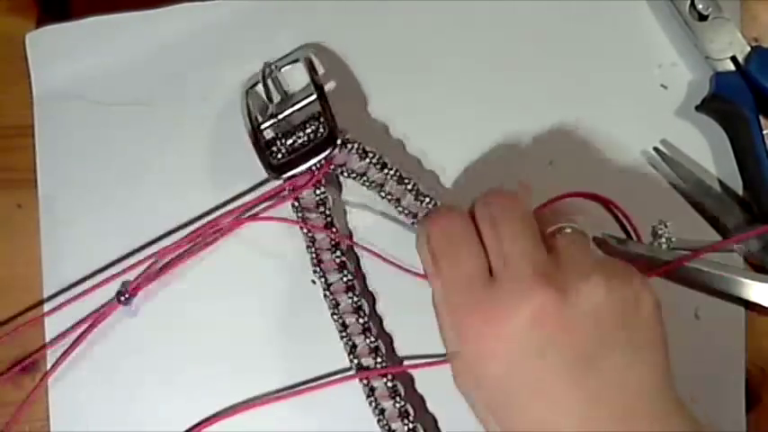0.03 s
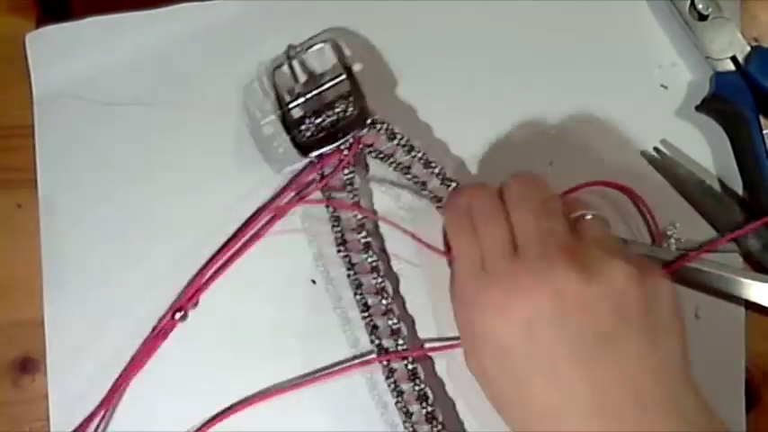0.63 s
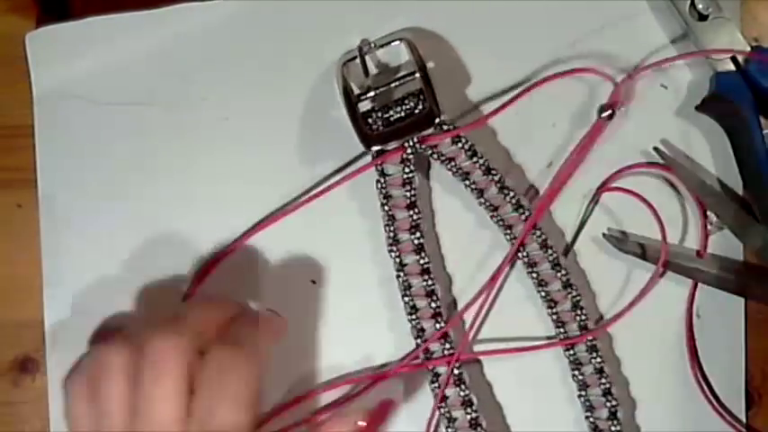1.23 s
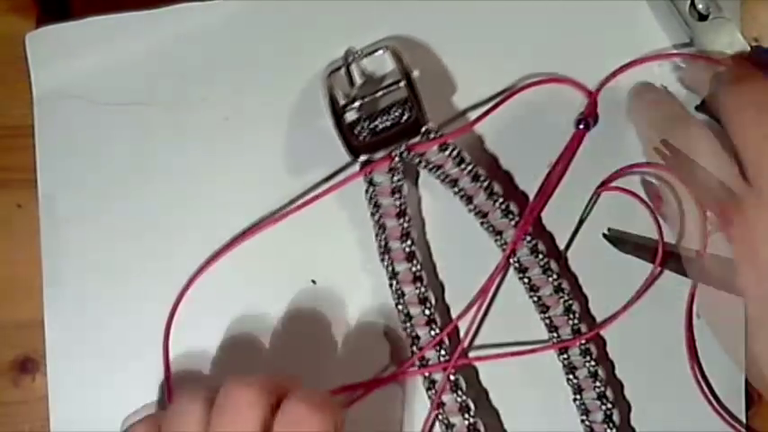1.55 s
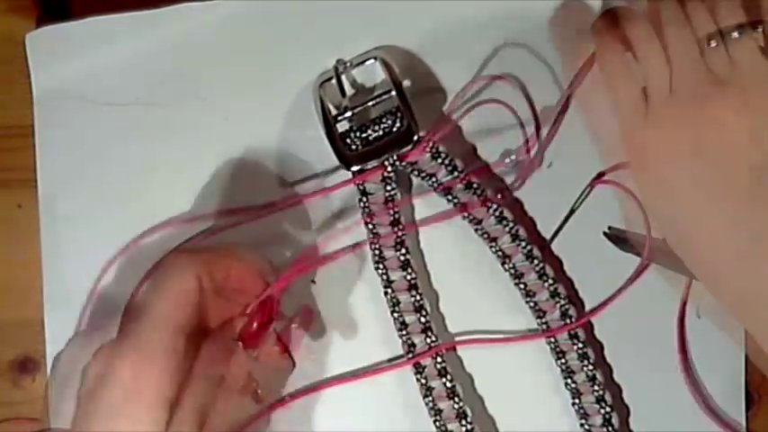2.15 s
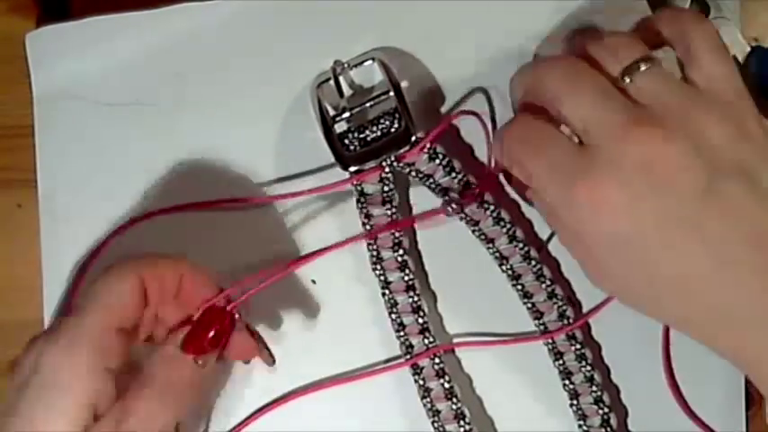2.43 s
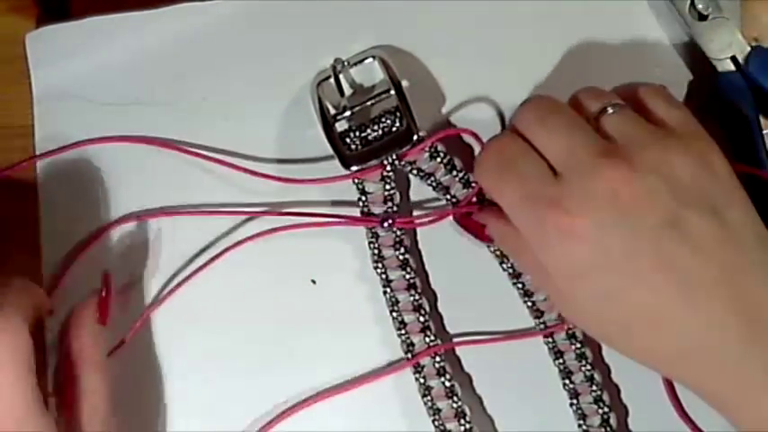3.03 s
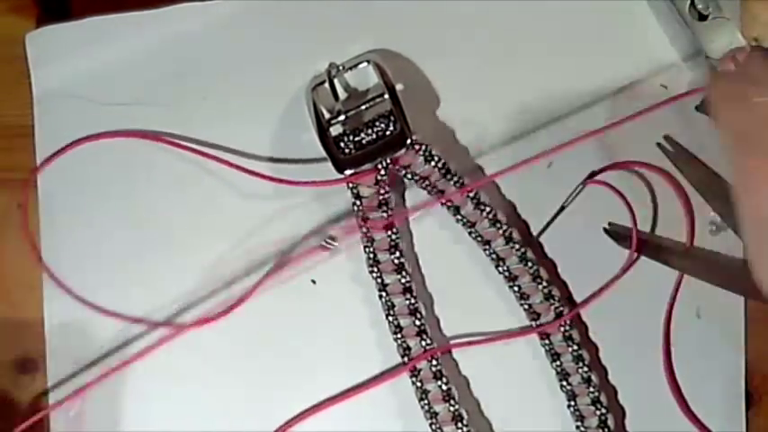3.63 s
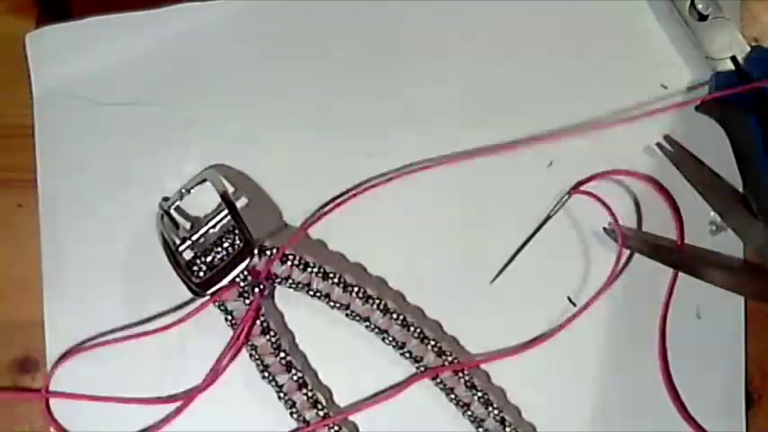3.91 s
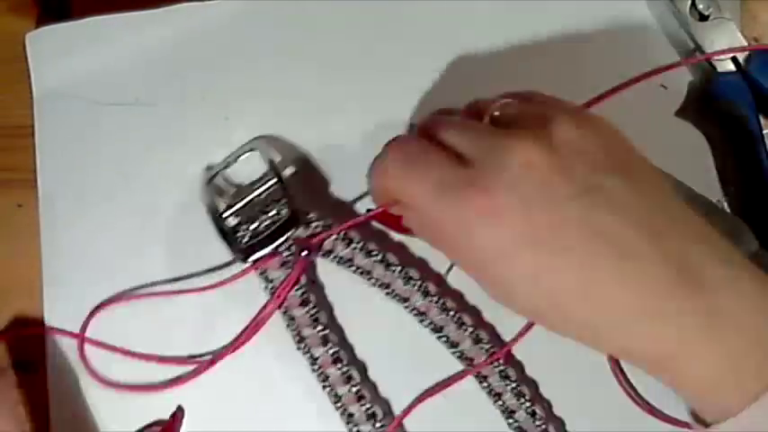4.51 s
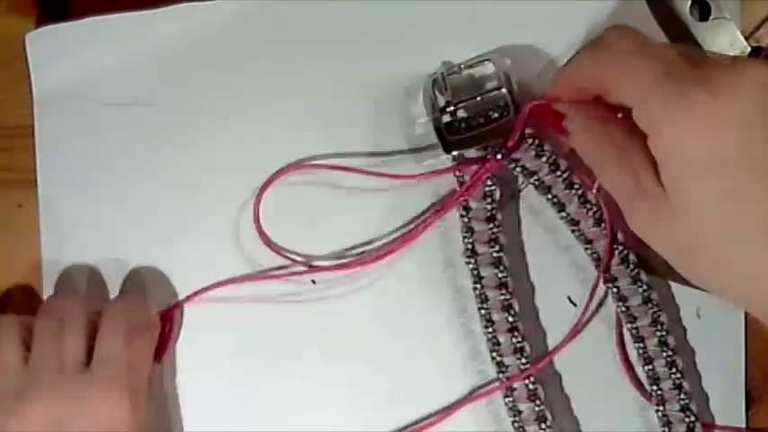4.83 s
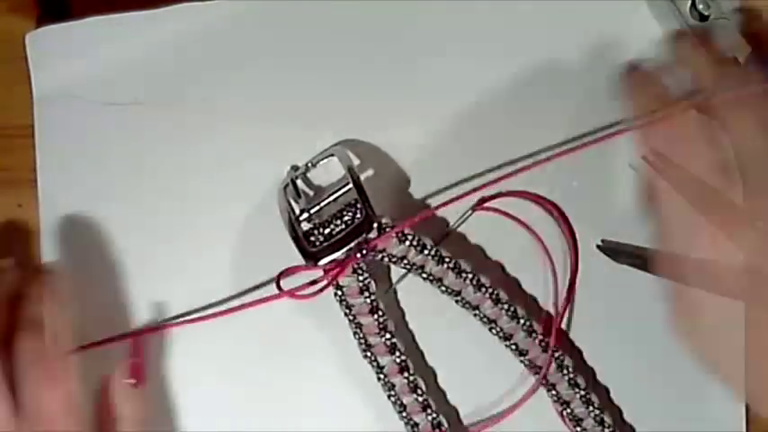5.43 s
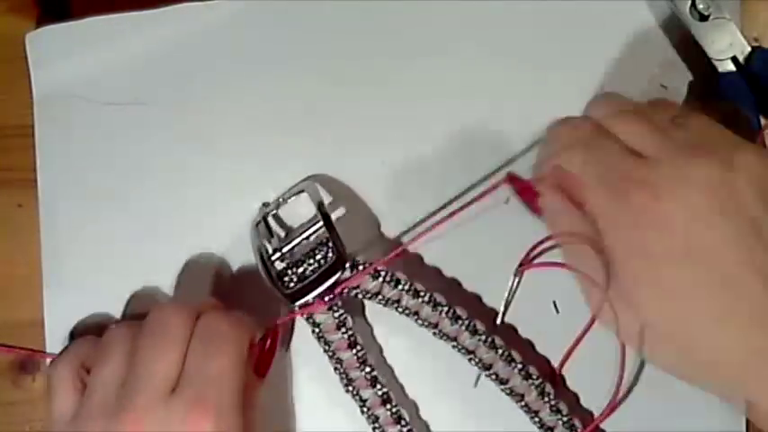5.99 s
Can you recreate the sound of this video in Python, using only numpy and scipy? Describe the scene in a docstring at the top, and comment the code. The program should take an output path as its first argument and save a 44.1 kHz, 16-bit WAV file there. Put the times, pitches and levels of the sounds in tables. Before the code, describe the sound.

A beaded collar knocks and drags on a paper-covered wooden table, with hissing cord pulls, small ticks and a scissor clink.

```python
"""A beaded collar knocks and drags on a paper-covered wooden table while hands thread cord through it.
Each landing makes the table top boom near 470 Hz, and sliding beads rumble, scrape and tick.
The cord hisses as its fibres catch and slip, and fingertips judder on the table.
Nudged scissors clink and small metal parts ring faintly, close to a small microphone in a quiet room."""
import sys
import numpy as np
from scipy import signal
from scipy.fft import rfft, irfft, next_fast_len
from scipy.io import wavfile
from scipy.ndimage import map_coordinates

SR = 44100
rng = np.random.default_rng(int(sys.argv[2]) if len(sys.argv) > 2 else 0)


def waveform_to_disk(signal):
    """Save audio, clipped to [-1, 1], as 16-bit WAV at the path in sys.argv[1]."""
    frames = np.transpose(np.atleast_2d(signal))
    scaled = np.clip(frames, -1, 1) * 32767
    samples = np.round(scaled).astype(np.int16)
    wavfile.write(sys.argv[1], SR, samples)


N = 276066
AGE = np.arange(SR // 2) / SR  # seconds since one short sound began
TOP_HZ = 15600  # the microphone hears nothing above this

# Levels compare rows within a table. A ring time is how long a sound takes to fade by 60 dB.
# The tone colour of each noise. Each row: frequency in Hz, level in dB.
AIR_COLOUR = [(15, -56.5), (25, -17), (137, -5.5), (354, -7.5), (451, -2.5), (677, -13), (840, -6.5),
              (911, -14.5), (1020, -9.5), (1190, -13), (3080, -21), (3620, -22.5), (4740, -25.5),
              (5140, -26.5), (9000, -27.5), (12500, -36.5), (15000, -56)]
HISS_COLOUR = [(3000, -51), (5500, -30.5), (7000, -3.5), (8300, 4), (9300, -4), (10500, -13),
               (12500, -23.5), (15000, -40)]
RASP_COLOUR = [(1000, -52), (3200, -30), (4500, -14), (5400, -6.5), (5900, -4), (6700, 1.5), (7400, -1),
               (9000, -27), (15000, -46.5)]
RUMBLE_COLOUR = [(25, -64), (60, -43.5), (120, -37.5), (250, 0), (400, 7), (490, 8), (660, 4.5), (800, -15),
                 (1050, -24), (1400, -24), (2200, -43), (4000, -39.5), (9000, -51)]
THUD_COLOUR = [(25, -49.5), (60, -22), (120, -35), (230, 8), (400, -2.5), (490, 7), (660, -4), (800, -42),
               (1100, -29), (2000, -48.5), (4000, -79)]
CLACK_COLOUR = [(300, -21), (700, 8), (1100, 0.5), (1600, 1.5), (2100, -8), (2700, -2), (4000, -8),
                (6000, -4.5), (10000, -15.5), (15000, -43)]
# The room's echo. Each row: frequency in Hz, ring time in seconds.
ECHO_TIMES = [(150, .3), (1000, 0.18), (8000, 0.13)]
# The notes a struck thing rings with. Each row: pitch in Hz, level in dB, ring time in seconds.
SCISSOR_NOTES = [(1728, -6, .12), (2435, 0, .13), (2778, -9, .11), (3122, -3, .14), (4037, -10, .14),
                 (4707, -2.5, .17), (5551, -1, .18), (5750, -2, .12), (5952, -3, .17), (6112, -3, .16),
                 (6993, -8, .17), (7429, -7, .16), (7891, -4, .15), (10700, -21, .1)]
SOFT_SCISSOR_NOTES = [(1780, -4.5, .075), (2435, -8.5, 0.057), (3122, -17.5, 0.048), (10870, -26, 0.1)]
BUCKLE_NOTES = [(5415, 2.5, 0.082), (4860, -17, .03), (11950, -2.5, 0.067)]
BEAD_NOTES = [(7330, -1.5, 0.022), (8400, -9, .015), (9170, -4.5, 0.03)]
TABLE_NOTES = [(122, -24, .28), (172, -16, .11), (224, -12, .12), (265, -11, .14), (318, -7, .14),
               (375, -10, .07), (467, 0, .15), (525, -6, .08), (590, -10, .07), (651, -8, .09)]
# Moments when metal is touched. Each row: start in seconds, level in dB.
SCISSOR_NUDGES = [(0.1017, -14), (0.1741, -31)]
SCISSOR_TOUCHES = [(0.083, -32.5), (0.303, -37.5), (0.314, -32), (0.379, -33.5)]
BUCKLE_JINGLES = [(4.527, -36), (4.561, -23)]
BEAD_TOUCHES = [(3.676, -18), (3.736, -21.5)]
# Fingertips rubbing the table, and beads scraping the paper. Each row: loudest moment in seconds,
# level in dB, pitch in Hz, seconds to fall to half strength.
FINGER_RUBS = [(0.234, -40.5, 476, 0.012), (0.272, -33, 480, 0.01), (0.629, -32, 540, .004),
               (0.794, -24, 486, 0.0026), (0.868, -24.5, 463.6, 0.012), (2.351, -27, 487, 0.0029),
               (2.795, -52, 471, 0.014), (2.918, -54, 441, 0.01), (3.078, -54, 336, 0.0049),
               (3.732, -30, 453.5, .007), (4.309, -15.5, 485, 0.0088), (4.385, -20.5, 531, 0.0048),
               (4.431, -16.5, 515, 0.0041), (4.448, -13, 504, 0.0043), (4.716, -22.5, 477, 0.0078),
               (5.219, -34.5, 438, 0.0039), (5.377, -52.5, 508, 0.0056), (5.597, -38.5, 485, 0.0092),
               (5.762, -20, 503, 0.0039), (5.781, -29, 470, 0.0022), (5.990, -33.5, 464, .004),
               (6.150, -41, 500, 0.0066)]
BEAD_SCRAPES = [(0.3, -59.5, 2466, 0.047), (0.384, -55.5, 2330, 0.012), (0.771, -51, 1510, .012),
                (1.82, -48, 1630, 0.021), (3.756, -43, 1343, 0.03), (4.291, -50, 2540, 0.0047),
                (4.459, -44.5, 1770, 0.0092), (4.512, -57, 1280, 0.018), (4.746, -47, 1325, 0.025),
                (4.797, -50.5, 1500, .01), (4.845, -47.5, 1270, 0.02), (5.334, -50, 2860, 0.012),
                (5.683, -51, 3160, 0.02)]
# Small ticks. Each row: start in seconds, level in dB, the crack's pitch in Hz, its ring time in seconds. The
# row at 1.271 s adds a faint, soft noise just before the tick at 1.277 s; the rest are beads and nails.
SMALL_TICKS = [(0.315, -36.5, 7000, 0.041), (0.379, -55, 4500, .05), (0.545, -58, 8340, .04),
               (0.712, -40, 4395, 0.033), (0.768, -42, 5440, .006), (0.789, -32.5, 7100, 0.0085),
               (0.818, -26, 7600, 0.0065), (1.271, -52, 5130, .03), (1.277, -38, 5120, 0.056),
               (1.767, -33, 4920, .015), (2.023, -64, 6000, 0.13), (2.966, -63.5, 3856, 0.05),
               (3.204, -67, 7700, 0.049), (4.243, -44.5, 7250, .03), (4.303, -48, 4870, .024),
               (4.697, -30, 6400, 0.016), (4.796, -49.5, 7900, 0.023), (5.286, -34, 3960, 0.023),
               (5.295, -42, 2800, 0.1), (5.329, -43.5, 5900, .063), (5.624, -35, 8140, 0.016),
               (5.675, -24, 8360, .024)]
# Pulls on the cord. Each row: fastest moment in seconds, seconds speeding up, seconds slowing down,
# hiss level in dB, rasp in dB above the hiss (before a 2 dB cut).
CORD_PULLS = [(0.359, 0.1, .05, -61.5, 3), (0.76, 0.24, 0.069, -48.5, 2.5), (1.09, 0.076, 0.08, -49, -5),
              (1.769, 0.095, 0.13, -55.5, 3), (1.851, 0.06, 0.062, -56, -2.5),
              (2.02, 0.071, 0.045, -53, -12.5), (2.186, 0.19, .125, -51, -13.5),
              (2.409, 0.054, 0.031, -70, 0), (2.469, 0.048, 0.065, -59, 0),
              (2.648, 0.064, 0.044, -61, -1.5), (2.834, 0.036, 0.048, -71, -13),
              (2.991, .06, 0.041, -64, -2.5), (3.553, 0.032, 0.076, -57.5, -4.5),
              (3.645, .025, .05, -55, -33), (3.745, 0.12, 0.12, -56, 6.5),
              (3.874, 0.047, 0.033, -58.5, -1.5), (4.0, .06, 0.052, -69.5, 0.5),
              (4.143, 0.032, 0.12, -56, -20), (4.285, 0.084, 0.13, -55.5, -4.5),
              (4.444, .04, 0.055, -54.5, -4.5), (4.51, .09, 0.2, -52, -4.5), (4.71, 0.1, 0.17, -53.5, -22),
              (5.01, 0.046, 0.17, -48, -7.5), (5.689, 0.082, 0.13, -51, -1),
              (5.965, 0.094, 0.077, -68, -2.5), (6.105, 0.048, 0.054, -74, 1)]
# The collar sliding. Each row: fastest moment in seconds, seconds speeding up, seconds slowing down,
# level in dB, bass cutoff in Hz (higher when the collar rests lightly).
COLLAR_DRAGS = [(0.33, 0.058, 0.086, -42, 506), (0.645, .12, 0.12, -40, 380), (0.785, .17, 0.05, -34, 326),
                (1.79, 0.054, 0.092, -28.5, 149), (1.868, 0.053, 0.16, -51.5, 170),
                (2.39, 0.039, .13, -53.5, 170), (3.765, .125, .13, -28, 266), (4.46, 0.13, 0.19, -29, 185),
                (4.62, 0.16, 0.17, -42.5, 166), (4.74, 0.032, 0.075, -36, 140),
                (4.825, 0.044, .1, -27, 140), (5.05, 0.076, 0.17, -31, 200), (5.17, .06, .11, -43.5, 203),
                (5.66, 0.047, 0.037, -33.5, 203), (5.741, 0.066, .1, -37.5, 251),
                (5.9, 0.028, 0.066, -47, 300), (5.989, .08, 0.074, -49.5, 338),
                (6.13, 0.06, 0.073, -51.5, 340)]
# Collar, buckle and knuckles landing. Each row: start in seconds, level of boom and thud in dB,
# clack level in dB, the clack's treble cutoff in Hz.
TABLE_KNOCKS = [(0.081, -27.5, -39.5, 4430), (0.103, -25, -28.5, 3800), (0.17, -28, -38.5, 4200),
                (0.546, -57.5, -48, 2100), (0.622, -38, -64, 1500), (0.712, -54, -36, 4170),
                (0.852, -23, -32, 2820), (1.278, -56, -47, 3000), (1.705, -25, -46, 1810),
                (1.724, -22.5, -37, 1880), (1.734, -18, -24, 3940), (1.767, -20, -25.5, 3560),
                (2.24, -38, -74, 1480), (2.357, -32, -58.5, 1500), (2.956, -49.5, -59, 4020),
                (3.430, -32.5, -56, 1590), (3.457, -38, -79, 1490), (3.683, -33.5, -57, 1500),
                (3.724, -25.5, -41, 1820), (3.733, -38, -30, 1800), (4.237, -20.5, -35, 3700),
                (4.280, -24.5, -44.5, 4470), (4.297, -14.5, -27, 4500), (4.698, -17.5, -28.5, 4700),
                (4.798, -23, -25.5, 1760), (5.039, -31, -40, 1470), (5.626, -20, -31, 3780),
                (5.941, -34.5, -65, 1490)]


def amp(db):
    """Turn decibels into a multiplier."""
    return 10 ** (np.asarray(db) / 20)


def unit(x):
    """Scale a sound to an average strength (rms) of 1."""
    return x / np.sqrt(np.mean(x ** 2) + 1e-20)


def fade(ring_s):
    """Die away by 60 dB in ring_s seconds."""
    return np.exp(-np.log(1000) * AGE / np.maximum(ring_s, 1e-3))


def onset(attack_s):
    """Rise quickly from silence to full strength."""
    return 1 - np.exp(-AGE / attack_s)


def swell(half_s):
    """A smooth rise and fall, loudest in the middle of AGE."""
    return 1 / np.cosh(np.clip(1.3 * (AGE - AGE.mean()) / half_s, -50, 50))


def stroke(rise_s, fall_s):
    """A hand's speed, from 0 to 1: it gathers pace, then slows to rest."""
    t = AGE - rise_s
    return np.sin(np.pi / 2 * np.clip(np.minimum(1 + t / rise_s, 1 - t / fall_s), 0, 1))


def along(points, hz):
    """Read between (Hz, value) points on a logarithmic frequency scale."""
    point_hz, values = np.transpose(points)
    return np.interp(np.log(hz + 1), np.log(point_hz + 1), values)


def coloured(x, colour):
    """Give a sound a tone colour, at strength 1."""
    hz = np.fft.rfftfreq(len(x), 1 / SR)
    return unit(irfft(rfft(x) * amp(along(colour, hz)), len(x)))


def band_pass(x, low_hz, high_hz):
    """Gently turn down everything outside two frequencies."""
    return signal.sosfilt(signal.butter(2, [low_hz, high_hz], "bandpass", fs=SR, output="sos"), x)


def add(track, start_s, sound):
    """Mix a sound into the track."""
    part = track[max(round(start_s * SR), 0):][:len(sound)]
    part += sound[:len(part)]


def slips(per_second, spread_db):
    """Friction: tiny random clicks of uneven size."""
    count = len(AGE)
    sizes = rng.choice([-1, 1], count) * amp(spread_db * rng.standard_normal(count))
    return unit((rng.random(count) < per_second / SR) * sizes)


def wander(depth, per_second):
    """The smooth random wobble of a loose or catching contact."""
    return depth * map_coordinates(rng.standard_normal(len(AGE)), [AGE * per_second])


def rattling(sound, flutter_db):
    """A loosely held part flutters in level as it rings."""
    return sound * amp(wander(flutter_db, per_second=200) - .5)


def ring(notes, scatter_db):
    """A struck thing: each blow shares the same energy differently among its notes."""
    hz, db, ring_s = np.transpose(notes)[:, :, None]
    gain = amp(db + scatter_db * rng.standard_normal(hz.shape)) * rng.choice([-1, 1], hz.shape)
    return np.sum(gain * np.sin(2 * np.pi * hz * AGE) * fade(ring_s), axis=0) / np.linalg.norm(gain)


def burst(colour, ring_s, attack_s):
    """Fading noise stands for many close notes dying together."""
    return coloured(rng.standard_normal(len(AGE)), colour) * fade(ring_s) * onset(attack_s)


def room_air():
    """The steady hush of a quiet room."""
    return coloured(rng.standard_normal(N), AIR_COLOUR)


def room_echo(sound):
    """The small room answers 5 ms later with a short echo whose treble dies first."""
    hz, t, spectrum = signal.stft(rng.standard_normal(len(AGE)), SR, nperseg=256)
    decay = np.exp(-np.log(1000) * t / along(ECHO_TIMES, hz)[:, None])
    tail = signal.istft(spectrum * decay, SR, nperseg=256)[1]
    echo = np.pad(tail, (SR // 200, 0)) / np.linalg.norm(tail)
    return signal.fftconvolve(sound, echo)[:N]


def metal_touches():
    """Lightly touched scissors, buckle and beads ring, and buzz as loose parts meet again and again."""
    out = np.zeros(N)
    parts = (SCISSOR_TOUCHES, SOFT_SCISSOR_NOTES), (BUCKLE_JINGLES, BUCKLE_NOTES), (BEAD_TOUCHES, BEAD_NOTES)
    for touches, notes in parts:
        for start_s, db in touches:
            tone = ring(notes, scatter_db=1) * onset(0.0055)
            bounces = slips(per_second=1500, spread_db=1.5) * fade(0.058)
            buzz = signal.fftconvolve(tone, bounces)[:len(AGE)]
            buzz *= np.linalg.norm(tone) / np.linalg.norm(buzz)
            add(out, start_s, amp(db - 2) * rattling(tone + amp(-9.5) * buzz, flutter_db=5))
    return out


def scissor_clinks():
    """Nudged steel blades crack together, then ring and clatter."""
    out = np.zeros(N)
    crack_colour = [(300, -26), (1500, -11), (6000, -11), (8500, 5.5), (11000, -11), (15000, -36)]
    clatter_colour = [(1000, -26.5), (2400, -6.5), (3700, -2.5), (5800, 5.5), (8000, -8),
                      (9500, -25), (15000, -52)]
    for start_s, db in SCISSOR_NUDGES:
        blades = rattling(ring(SCISSOR_NOTES, scatter_db=1), flutter_db=1.8) * onset(0.0012)
        crack = burst(crack_colour, ring_s=0.091, attack_s=.0003)
        clatter = burst(clatter_colour, ring_s=0.21, attack_s=0.0022)
        add(out, start_s, amp(db) * (amp(-4) * blades + amp(-18.5) * (crack + clatter)))
    return out


def finger_rubs():
    """A fingertip judders briefly, mostly near the table's strongest note."""
    out = np.zeros(N)
    for peak_s, db, hz, half_s in FINGER_RUBS:
        tone = np.sin(2 * np.pi * hz * AGE + wander(depth=.2, per_second=100))
        add(out, peak_s - AGE.mean(), amp(db) * swell(half_s) * tone)
    return out


def small_ticks():
    """Each tick is a snap, a short crack of noise, then a faint rattle."""
    out = np.zeros(N)
    for start_s, db, hz, ring_s in SMALL_TICKS:
        colour = [(hz / 14, -30), (hz / 2.4, -10), (hz, 0), (hz * 1.3, -5), (hz * 2, -31), (hz * 4, -60)]
        snap = signal.unit_impulse(len(AGE))
        for _ in range(2):  # a narrow band makes the snap ring a little
            snap = band_pass(snap, hz * .6, hz * 1.2)
        rattle = burst(colour, ring_s=.1, attack_s=.003)
        crack = burst(colour, ring_s, attack_s=0.00042)
        add(out, start_s, amp(db) * (amp(14) * snap + crack + amp(-21) * rattle))
    return out


def bead_scrapes():
    """Hard beads rasp over the paper in short surges."""
    out = np.zeros(N)
    for peak_s, db, hz, half_s in BEAD_SCRAPES:
        colour = [(hz / 5, -30), (hz / 2, -5), (hz, 0), (hz * 1.18, -4), (hz * 1.43, -18),
                  (hz * 4, -40), (hz * 8, -60)]
        rasp = coloured(slips(per_second=1400, spread_db=5.5), colour)
        add(out, peak_s - AGE.mean(), amp(db) * swell(half_s) * rasp)
    return out


def cord_pulls():
    """Fibres catch and slip: a faster pull is louder, and a tighter grip adds a coarser rasp."""
    out = np.zeros(N)
    ripple_db, spacing_hz = 2.5, 400  # each grip adds its own peaks and dips to the tone colour
    for fastest_s, rise_s, fall_s, db, rasp_db in CORD_PULLS:
        grip = [(hz, ripple_db * rng.standard_normal()) for hz in np.arange(spacing_hz, TOP_HZ, spacing_hz)]
        hiss = coloured(slips(per_second=9000, spread_db=6.5), HISS_COLOUR)
        rasp = coloured(slips(per_second=5000, spread_db=5.5), RASP_COLOUR)
        friction = coloured(hiss, grip) + amp(rasp_db - 2) * coloured(rasp, grip)
        snags = amp(wander(depth=1.8, per_second=80))
        speed = stroke(rise_s, fall_s)
        add(out, fastest_s - rise_s, amp(db) * speed ** 2.2 * snags * friction)
    return out


def collar_drags():
    """Beads stutter over the paper and shake the table, harder the faster the collar slides."""
    out = np.zeros(N)
    for fastest_s, rise_s, fall_s, db, cutoff_hz in COLLAR_DRAGS:
        wood = ring(TABLE_NOTES, scatter_db=2) * onset(.002)
        stutter = slips(per_second=500, spread_db=0)
        boom = unit(signal.fftconvolve(stutter, wood)[:len(AGE)])
        rumble = coloured(slips(per_second=700, spread_db=1.5), RUMBLE_COLOUR)
        drag = unit(band_pass(boom + amp(-7) * rumble, cutoff_hz, 6000))
        speed = stroke(rise_s, fall_s)
        add(out, fastest_s - rise_s, amp(db - 0.5) * speed ** 2.22 * drag)
    return out


def collar_knocks():
    """Each landing booms in the table top; a harder contact has a brighter clack."""
    out = np.zeros(N)
    for start_s, db, clack_db, cutoff_hz in TABLE_KNOCKS:
        boom = amp(3) * ring(TABLE_NOTES, scatter_db=3) * onset(0.0025)
        thud = amp(-7.5) * burst(THUD_COLOUR, ring_s=0.18, attack_s=0.0012)
        softened = [(hz, level - 10 * np.log10(1 + (hz / cutoff_hz) ** 12)) for hz, level in CLACK_COLOUR]
        clack = burst(softened, ring_s=0.093, attack_s=0.0015)
        add(out, start_s, amp(db) * (boom + thud) + amp(clack_db) * clack)
    return out


def scene():
    """The handiwork, its echo and the room's hush, in one channel."""
    work = collar_knocks() + finger_rubs() + collar_drags() + bead_scrapes() + cord_pulls()
    work += small_ticks() + scissor_clinks() + metal_touches()
    hush = amp(-69.5) * room_air()
    return (work + amp(-15) * room_echo(work) + hush)[None]


def record(dry):
    """The small microphone loses the deep bass, dulls the highest treble and stops at TOP_HZ."""
    thin = signal.sosfilt(signal.butter(2, 85, "highpass", fs=SR, output="sos"), dry)
    size = next_fast_len(N + SR // 2)
    hz = np.fft.rfftfreq(size, 1 / SR)
    treble = amp(along([(12000, -0.5), (15000, -4)], hz)) * (hz < TOP_HZ)
    return irfft(rfft(thin, size) * treble, size)[..., :N]


dry = scene()
out = record(dry)
waveform_to_disk(out)
```